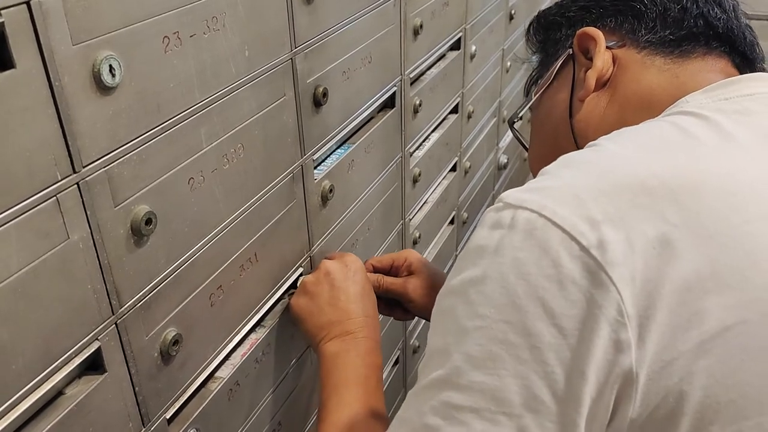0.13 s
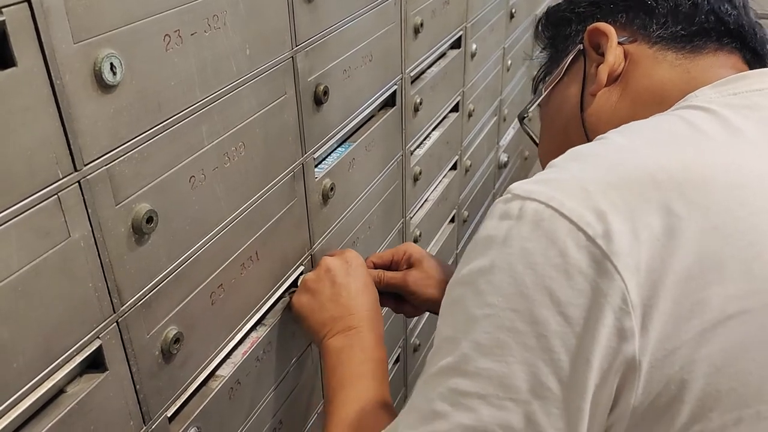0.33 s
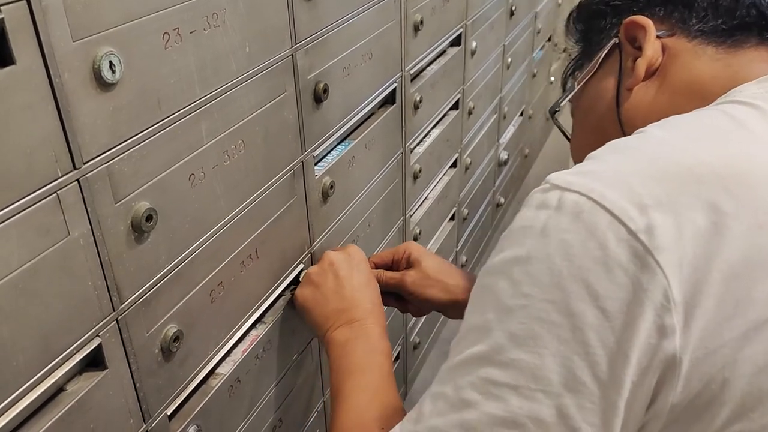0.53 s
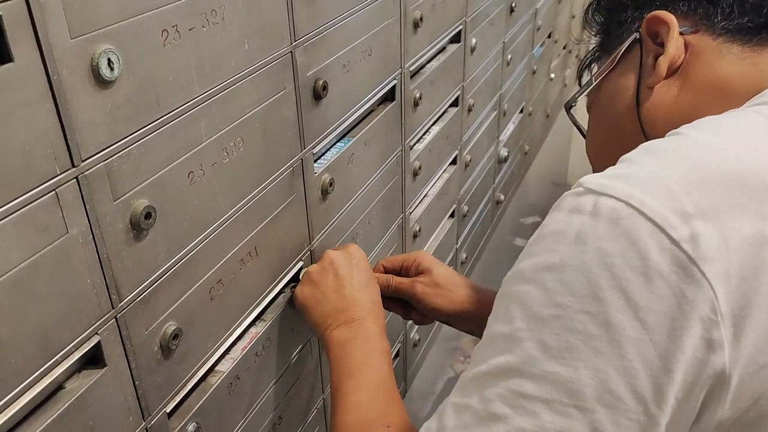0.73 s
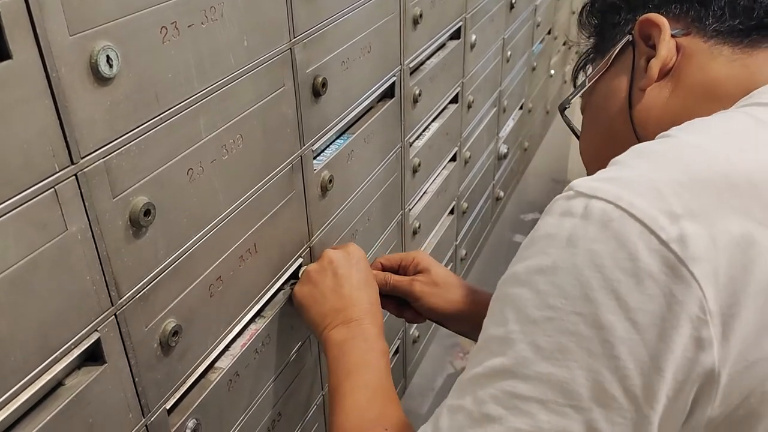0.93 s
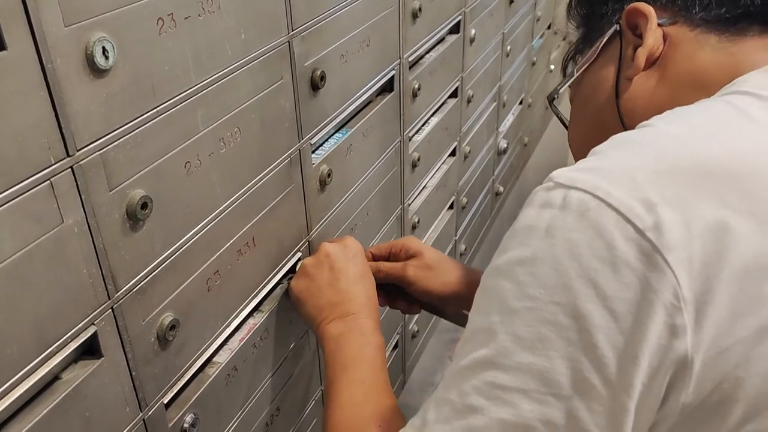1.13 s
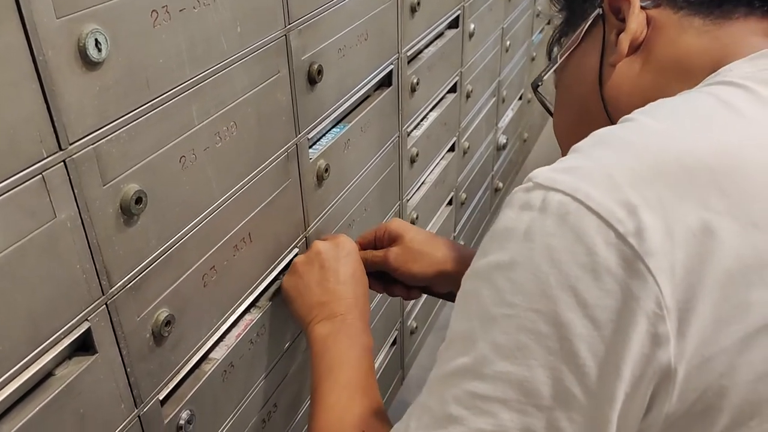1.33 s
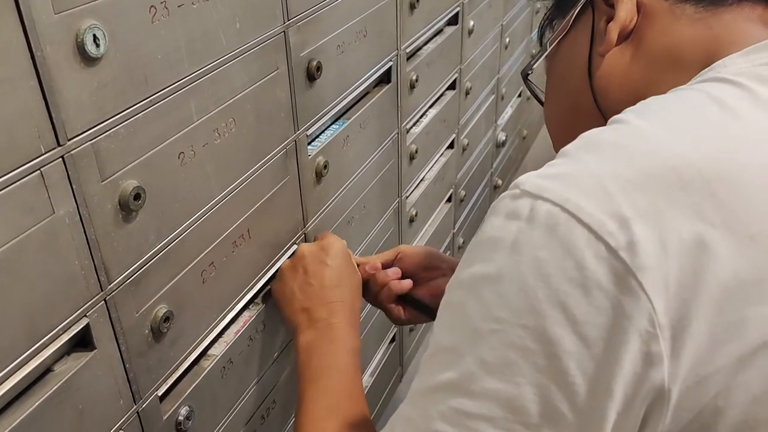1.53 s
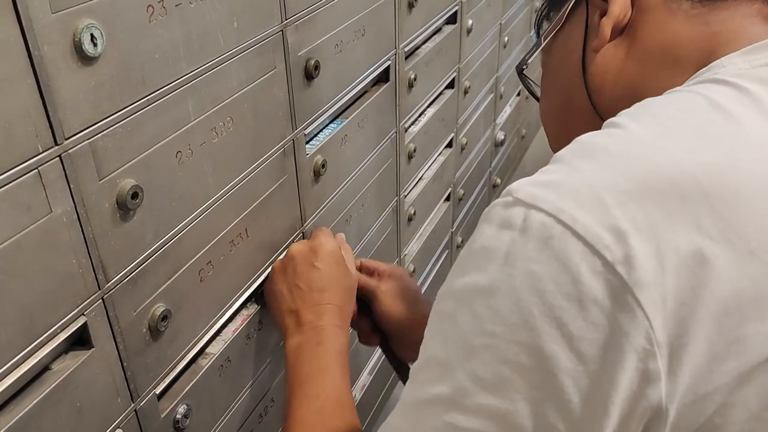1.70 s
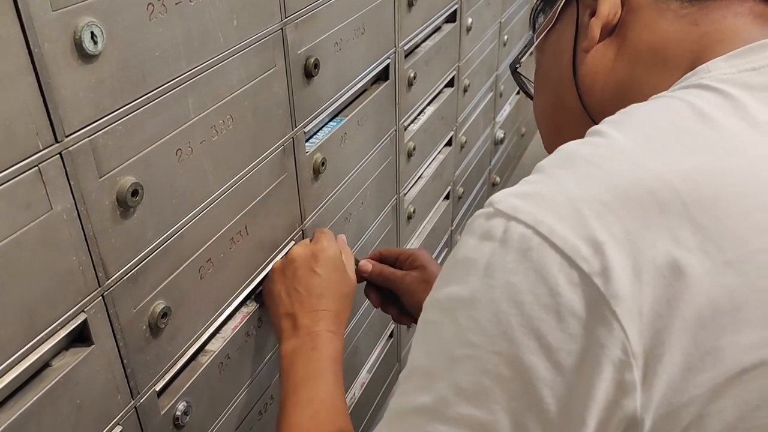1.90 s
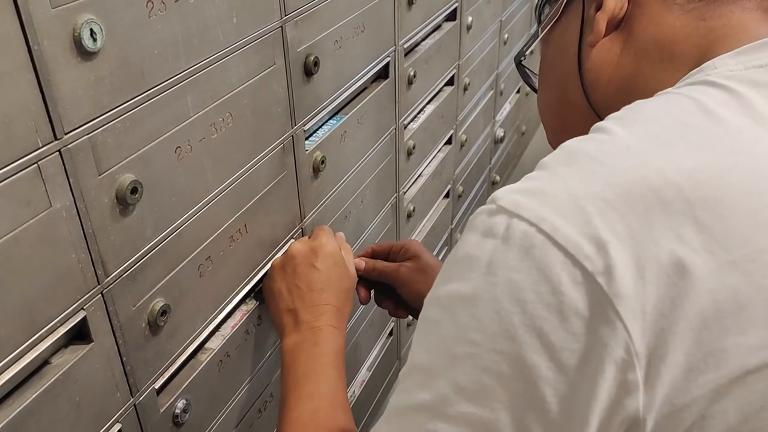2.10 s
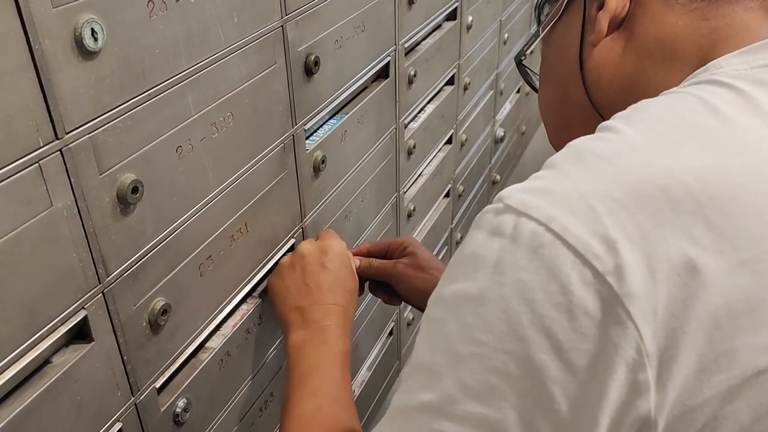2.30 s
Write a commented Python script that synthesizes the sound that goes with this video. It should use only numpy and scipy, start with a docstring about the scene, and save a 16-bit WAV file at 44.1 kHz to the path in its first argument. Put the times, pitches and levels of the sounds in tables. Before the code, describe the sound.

A mailbox lock snaps and rattles under a key, its thin metal door booming softly indoors

```python
"""Hands work a key in the lock of a steel mailbox, close to a stereo microphone in a hard-walled lobby.
The bolt snaps and clicks: noise bursts and decaying lock modes. The key pings, as short sines, and
scrapes, as a stream of tiny slips. The thin door booms in low panel modes.
A near wall and a ringing tail place lock and key in the room.
Ventilation rumbles underneath: coloured noise and two wavering hums."""
import sys
import numpy as np
from scipy import signal
from scipy.fft import rfft, irfft, next_fast_len
from scipy.io import wavfile
from scipy.ndimage import map_coordinates

SR = 44100
rng = np.random.default_rng(int(sys.argv[2]) if len(sys.argv) > 2 else 0)


def waveform_to_disk(signal):
    """Save audio, clipped to [-1, 1], as 16-bit WAV at the path in sys.argv[1]."""
    frames = np.transpose(np.atleast_2d(signal))
    scaled = np.clip(frames, -1, 1) * 32767
    samples = np.round(scaled).astype(np.int16)
    wavfile.write(sys.argv[1], SR, samples)


N = 103635  # samples

# stereo likeness of the close sounds and the lobby tail: (f/Hz, left-right likeness)
NEAR_ALIKE = [(150, 0.34), (500, 0.69), (1200, 0), (4000, 0.017), (12000, 0.066)]


def amp(db):
    """Gain of a level in dB."""
    return 10 ** (np.asarray(db) / 20)


def unit(x):
    """x at rms 1."""
    return x / np.sqrt(np.mean(x ** 2) + 1e-20)


def along(points, hz):
    """Interpolate (f/Hz, value) points on a log frequency axis."""
    f, v = np.transpose(points)
    return np.interp(np.log(hz + 1), np.log(f + 1), v)


def curves(rows):
    """One value per sample for each column after the time."""
    s, *cols = np.transpose(rows)
    return [np.interp(np.arange(N) / SR, s, c) for c in cols]


def wobble(rate):
    """A smooth random curve with rate knots a second."""
    knots = rng.standard_normal(int(N * rate / SR) + 4)
    return map_coordinates(knots, [np.arange(N) * rate / SR])


def coloured(x, db_of_hz):
    """x through a causal minimum-phase filter of the given gain, built from its folded cepstrum."""
    n = x.shape[-1]
    m = 2 * next_fast_len(n // 2 + 4096)
    cepstrum = irfft(np.log(amp(db_of_hz(np.fft.rfftfreq(m, 1 / SR)))), m)
    cepstrum[1:m // 2] *= 2
    cepstrum[m // 2 + 1:] = 0
    return irfft(rfft(x, m) * np.exp(rfft(cepstrum)), m)[..., :n]


def noise(alike, size):
    """White stereo noise whose mid and side shares set the left-right likeness at each frequency."""
    likeness = np.clip(along(alike, np.fft.rfftfreq(size, 1 / SR)), -1, 1)
    turn = np.arccos(likeness) / 2
    spectra = rfft(rng.standard_normal((2, size)))
    mid, side = irfft(spectra * [np.cos(turn), np.sin(turn)], size)
    return np.array([mid + side, mid - side])


def dying(t60s, size):
    """Stereo noise in which each frequency dies at its own speed."""
    hz, t, z = signal.stft(noise(NEAR_ALIKE, size), SR, nperseg=256)
    decay = amp(-60 * t / along(t60s, hz)[:, None])
    return signal.istft(z * decay, SR, nperseg=256)[1][:, :size]


def fade(t, t60):
    """Exponential decay from t = 0, silent before."""
    return (t >= 0) * amp(-60 * np.abs(t) / t60)


def add(out, s, sound):
    """Mix a sound in at a time in seconds."""
    part = out[:, round(s * SR):][:, :sound.shape[-1]]
    part += sound[..., :part.shape[1]]


def lock():
    """Each contact snaps, chatters once, and rings the lock's modes and the steel sheet."""
    # contacts of key and bolt: (t/s, how freely the lock rings 0-1,
    # relative level/dB of the clack, the clank, the ring, the sizzle)
    clicks = [(.182, .3, -42, -47.5, -51, -60), (.2329, 1, -30, -27, -29.5, -44),
              (.4539, 1, -21, -17, -15, -25), (.591, .4, -35, -36, -40, -46),
              (.6002, .4, -20.5, -19.5, -18.5, -23.5), (.7647, .5, -27, -37.5, -45, -53),
              (1.2737, .9, -40, -42, -30.5, -54), (1.348, .7, -26.5, -30, -27, -42),
              (1.434, .3, -25.5, -37.5, -56, -68), (1.6102, .2, -47, -48.5, -50, -54.5),
              (1.724, .3, -37, -41, -47.5, -59.5), (1.7426, .3, -26, -26.5, -33, -52),
              (1.7812, .2, -35, -34, -37.5, -43), (1.8188, .2, -28.5, -33.5, -40, -44),
              (1.885, .6, -31, -46, -58, -60), (1.9315, .1, -45, -55.5, -40, -47),
              (2.1814, .2, -49, -49, -51, -58), (2.2403, .1, -51, -58, -56, -55.5)]
    # where those four levels apply: f/Hz
    band_hz = [850, 2600, 5500, 10500]
    # modes of lock and door: (f/Hz, relative level/dB, t60/s)
    modes = [(652, -10, 0.14), (1041, -8, 0.35), (1761, -17.5, 0.37), (1910, -18, 0.1), (2483, -7.5, 0.15),
             (3200, -12.5, 0.11), (3740, -22.5, 0.062), (4176, -13.5, 0.38), (4680, -15, 0.15),
             (5147, -6.5, 0.14), (5263, -7.5, 0.15), (6220, -15.5, 0.22), (10130, -8, .2)]
    # dense sheet-metal ring: (f/Hz, t60/s)
    sheet_t60 = [(200, 0.25), (1500, 0.15), (5000, 0.25), (15000, 0.17)]
    snap_db, snap_t60_s, crack_t60_s = -2, 0.0078, 0.038
    chatter_s, chatter_db = 0.005, -7
    mode_gain_db, sheet_db, contact_db = -17, -7, -1
    attack_s = 0.00032  # time constant
    hit_s = .025  # the opening stretch that sets each contact's level

    out, t = np.zeros((2, N)), np.arange(SR // 2) / SR
    for s, free, *band_db in clicks:
        snap = amp(snap_db) * fade(t, snap_t60_s)
        crack = fade(t, crack_t60_s)
        chatter = amp(chatter_db) * fade(t - chatter_s, crack_t60_s)
        blows = (snap + crack + chatter) * noise(NEAR_ALIKE, len(t))
        ring = 0
        for hz, db, t60 in modes:
            strength = amp(db + rng.normal(0, 3.3))  # each contact excites the modes differently
            ring = ring + strength * fade(t, t60) * np.sin(2 * np.pi * (hz * t + rng.random((2, 1))))
        sheet = amp(sheet_db) * dying(sheet_t60, len(t))
        hit = blows + free * amp(mode_gain_db) * ring + sheet
        hit = hit * (1 - np.exp(-t / attack_s))
        hit = hit / hit[:, t < hit_s].std()
        bands = list(zip(band_hz, band_db))
        add(out, s, coloured(hit, lambda hz: steel(hz, free) + along(bands, hz) + contact_db))
    return out


def steel(hz, free):
    """Gain in dB of the door's steel and the lock housing, whose resonances the fingers can damp."""
    # colour shared by all contacts: (f/Hz, gain/dB)
    sheet_colour = [(100, -22), (280, -9.5), (520, 0), (1100, 0.5), (1800, 0), (3500, 0.5), (5200, -0.5),
                    (6900, -2), (9500, 0), (12000, -3.5), (15500, -8.5)]
    # resonances and dips of a freely ringing lock housing: (f/Hz, half width/Hz, gain/dB)
    housing = [(640, 70, 2), (780, 60, -3), (1050, 80, 3), (1850, 200, 3), (3150, 150, 2), (4020, 170, 3),
               (4520, 170, -6), (5160, 170, 7), (5830, 170, -5), (6220, 150, 3), (6800, 180, -4),
               (8150, 250, -4), (8900, 300, 3)]
    bumps = sum(db * np.exp(-((hz - centre) / width) ** 2) for centre, width, db in housing)
    return along(sheet_colour, hz) + np.sqrt(free) * bumps


def key():
    """The key pings twice and drags through the lock in clumps of tiny slips."""
    # drag of the key, ahead of the room: (t/s, level/dB)
    scrape = [(1.712, -52), (1.75, -47), (1.8, -42.5), (1.815, -37.5), (1.845, -42.5), (1.89, -40),
              (1.915, -50.5), (1.95, -72)]
    # (f/Hz, relative level/dB)
    scrape_colour = [(150, -12.5), (330, -13), (620, 0.5), (1000, -6), (1500, -9.5), (3000, -14),
                     (5000, -15.5), (9000, -23), (15500, -38)]
    # briefly ringing partials, ahead of the room: (t/s, level/dB, f/Hz, t60/s)
    pings = [(1.274, -46, 6240, .07), (1.274, -44, 5450, .06), (1.932, -40, 5512, .07),
             (1.932, -43, 6640, .04)]
    slips_per_s, slip_spread_db = 5000, 3
    clump_db, clumps_per_s = 2.5, 110
    ping_wander = 0.58  # radians: the fingers roughen the ring

    moments = rng.random(N) < slips_per_s / SR
    slip_db = slip_spread_db * rng.standard_normal(N) + clump_db * wobble(clumps_per_s)
    slips = moments * amp(slip_db) * noise(NEAR_ALIKE, N)
    level_db, = curves(scrape)
    t = np.arange(N) / SR
    dragging = (t > scrape[0][0]) * (t < scrape[-1][0])
    out = unit(coloured(slips, lambda hz: along(scrape_colour, hz))) * amp(level_db) * dragging
    for s, db, hz, t60 in pings:
        phase = 2 * np.pi * (hz * t + rng.random((2, 1))) + ping_wander * wobble(250)
        add(out, s, amp(db) * fade(t, t60) * np.sin(phase))
    return out


def door():
    """The heavier pushes flex the door panel against its frame, and its low modes swell and die."""
    # pushes: (t/s, relative level/dB, f/Hz of the lowest mode, level/dB added to the overtones)
    thumps = [(0.233, -30.5, 152, -10), (0.602, -17.5, 153, 2), (1.275, -29.5, 143, -12),
              (1.349, -27, 133, -7), (1.434, -36, 125, -9), (1.745, -33, 150, -2), (1.811, -26.5, 155, -4)]
    # panel modes: (ratio to the lowest f, relative level/dB)
    panel = [(1, -0.5), (1.2, -13.5), (1.45, -14.5), (2.05, -17), (2.4, -19.5), (2.95, -16.5), (3.3, -19)]
    boom_db, boom_t60_s = -1, 0.18
    attack_s = 0.0063  # time constant of the lowest mode; higher modes swell faster

    out, t = np.zeros((2, N)), np.arange(SR // 2) / SR
    for s, db, hz, overtones_db in thumps:
        for ratio, mode_db in panel:
            swell = fade(t, boom_t60_s) * (1 - np.exp(-t * ratio ** 2 / attack_s))
            upper = ratio > panel[0][0]
            # only the overtones differ between left and right
            phase = upper * (2 * np.pi * rng.random() + rng.normal(0, 0.47, (2, 1)))
            level = amp(db + mode_db + boom_db + upper * overtones_db)
            add(out, s, level * swell * np.sin(2 * np.pi * hz * ratio * t + phase))
    return out


def lobby(x):
    """A near wall answers with the sides swapped as the hard room's tail sets in and rings on."""
    # reverberation of the lobby: (f/Hz, t60/s)
    room_t60 = [(150, .3), (600, 0.73), (2000, 0.37), (5000, 0.49), (9000, 0.4), (15000, 0.27)]
    wall_delay_s, wall_db, room_db = .015, -7.5, -11
    tail = dying(room_t60, SR)
    tail = tail / np.linalg.norm(tail[0])
    late = np.pad(x, ((0, 0), (round(wall_delay_s * SR), 0)))[:, :N]
    return amp(wall_db) * late[::-1] + amp(room_db) * signal.fftconvolve(late, tail, axes=1)[:, :N]


def ventilation():
    """A rush of coloured noise, slowly shifting in level, with two wavering low hums."""
    # colour of the rush: (f/Hz, relative level/dB)
    air_colour = [(12, -8), (20, 1.5), (101, -2), (123, -5), (216, -10), (241, -17), (388, -11.5),
                  (499, -12.5), (607, -13.5), (678, -15), (949, -18), (1030, -23), (2140, -22),
                  (2320, -25.5), (3440, -30.5), (6910, -38.5), (16000, -53)]
    # course of the rush: (t/s, relative level/dB)
    air_level = [(0.0, -49.5), (0.68, -48), (0.82, -50.5), (1.1, -52), (1.73, -51), (2.35, -53.5)]
    # stereo likeness of the rush: (f/Hz, left-right likeness)
    air_alike = [(30, 0.83), (150, 0.89), (400, 0.6), (1000, 0.1), (8000, 0.034)]
    # pitches of the two hums: f/Hz
    hum_hz = [61.25, 92]
    # course of the hums: (t/s, relative level/dB of the lower, relative level/dB of the upper)
    hum_level = [(0, -62, -80), (0.17, -47.5, -55.5), (0.45, -49, -57), (0.78, -44.5, -52),
                 (1.0, -57, -57.5), (1.3, -70, -58), (1.7, -56, -46), (2.35, -69, -54)]
    air_db, hum_db = 4.5, -2.5

    rush = unit(coloured(noise(air_alike, N), lambda hz: along(air_colour, hz)))
    out = rush * amp(curves(air_level)[0] + air_db)
    t = np.arange(N) / SR
    for hz, db in zip(hum_hz, curves(hum_level)):
        level = amp(db + hum_db + 2.8 * wobble(4.1))
        out = out + level * unit(np.sin(2 * np.pi * hz * t + 0.27 * wobble(11)))
    return out


def scene():
    """The mailbox in its lobby, balanced left to right at each frequency, over the ventilation."""
    # stereo balance of the mailbox: (f/Hz, left minus right level/dB)
    balance = [(150, 2.2), (1200, -0.5), (2500, .3), (5000, -2.1), (8000, 1), (13000, 7)]
    near = lock() + key()
    left, right = near + lobby(near) + door()
    left = coloured(left, lambda hz: along(balance, hz) / 2)
    right = coloured(right, lambda hz: -along(balance, hz) / 2)
    return np.array([left, right]) + ventilation()


def record(dry):
    """The recorder's steep low-pass removes the treble above its band limit."""
    top_hz = 16000
    return signal.sosfilt(signal.ellip(12, .1, 100, top_hz, fs=SR, output="sos"), dry)


dry = scene()
out = record(dry)
waveform_to_disk(out)
```